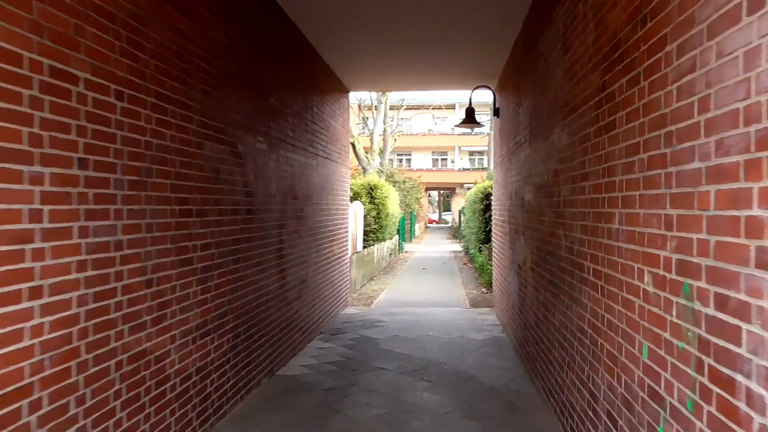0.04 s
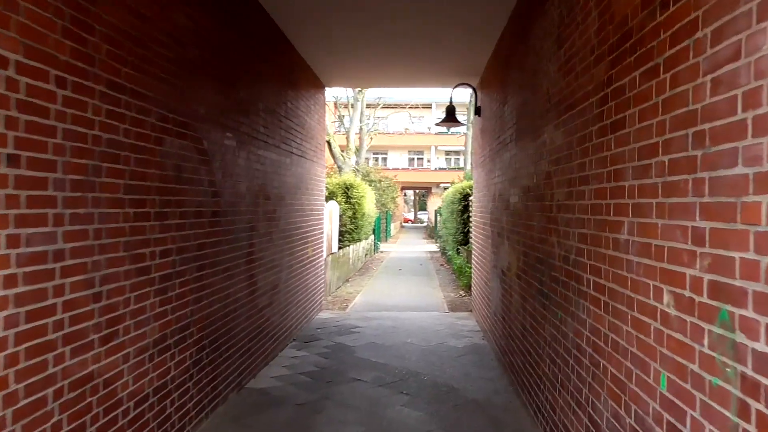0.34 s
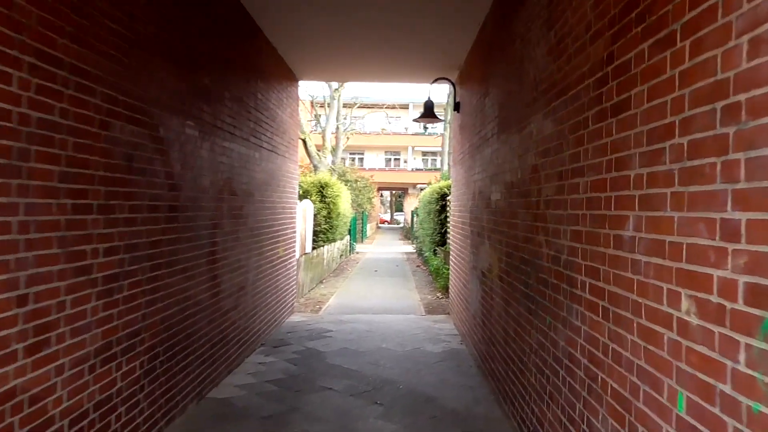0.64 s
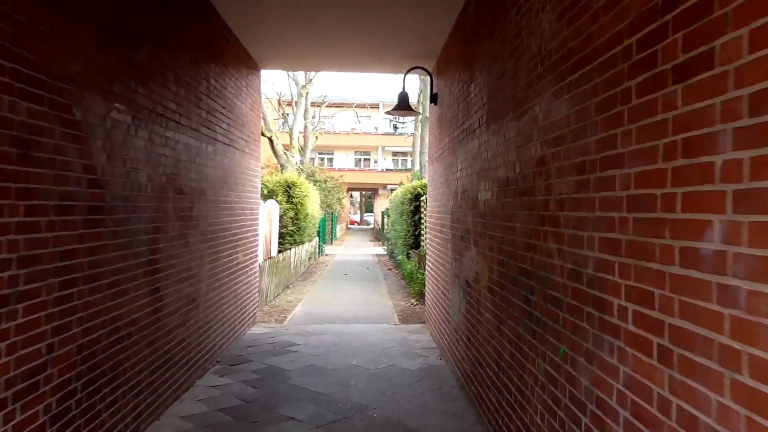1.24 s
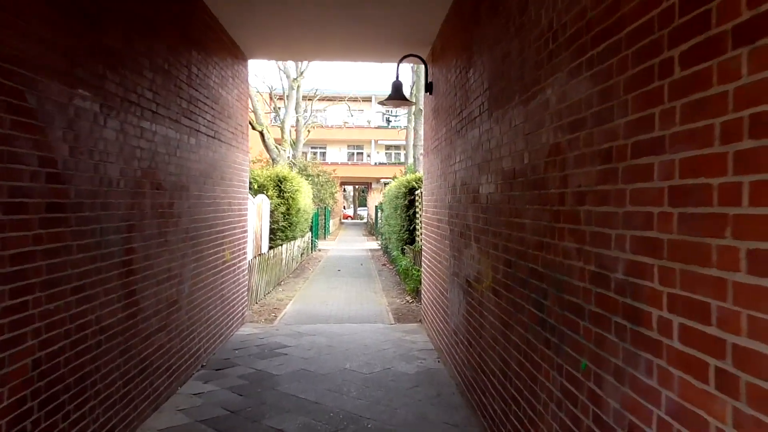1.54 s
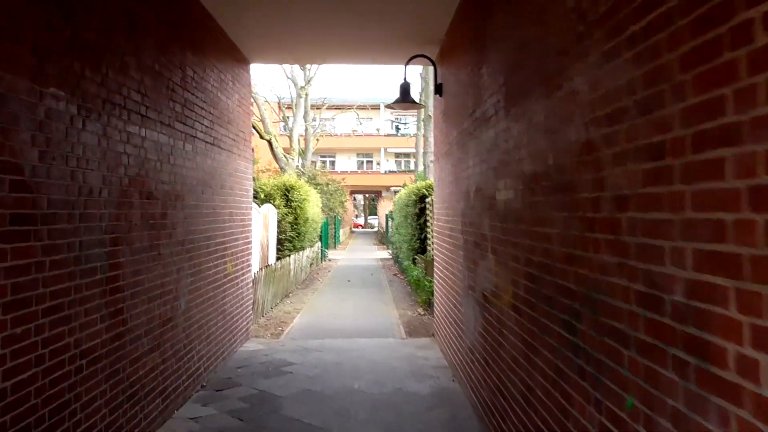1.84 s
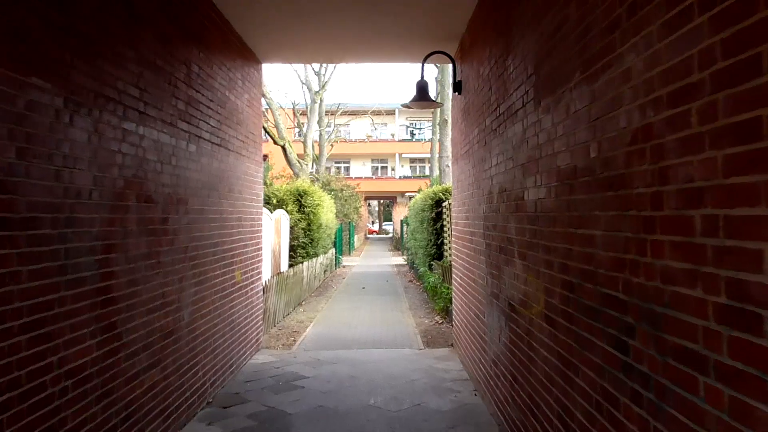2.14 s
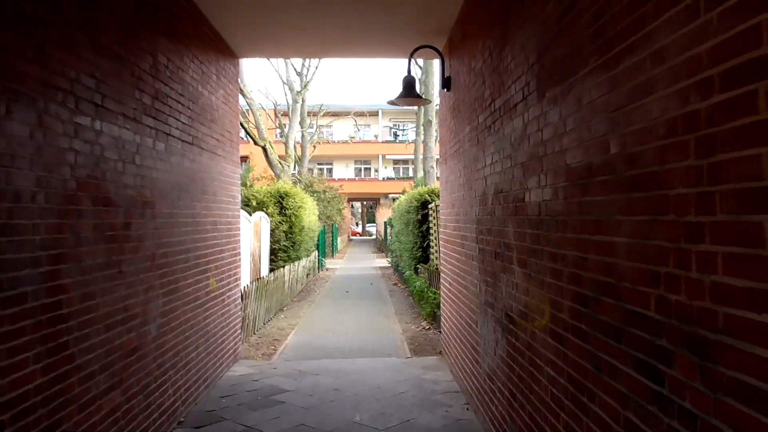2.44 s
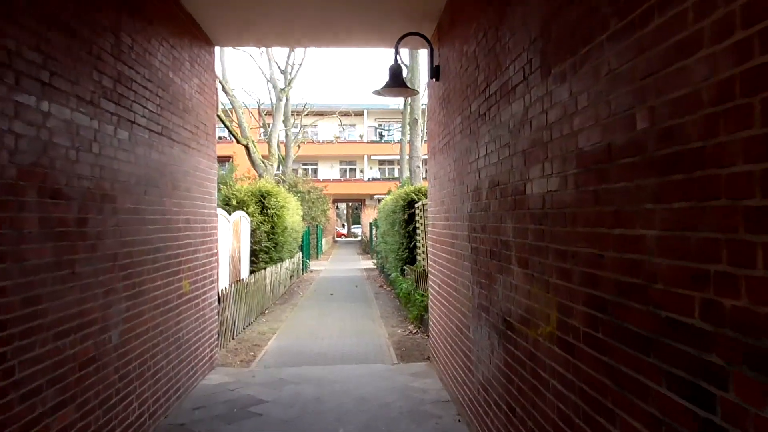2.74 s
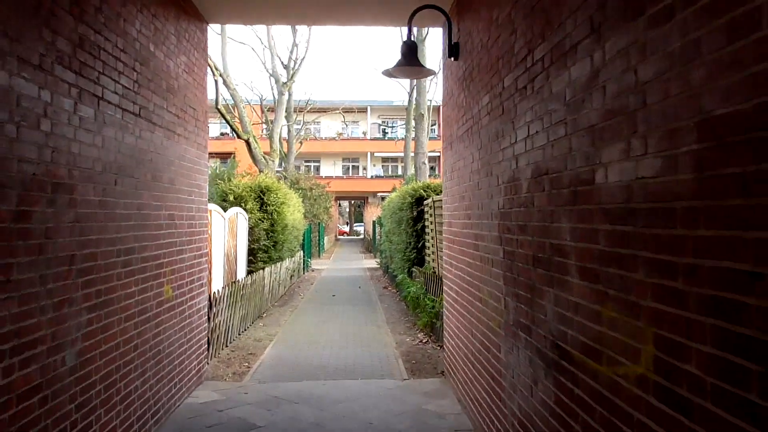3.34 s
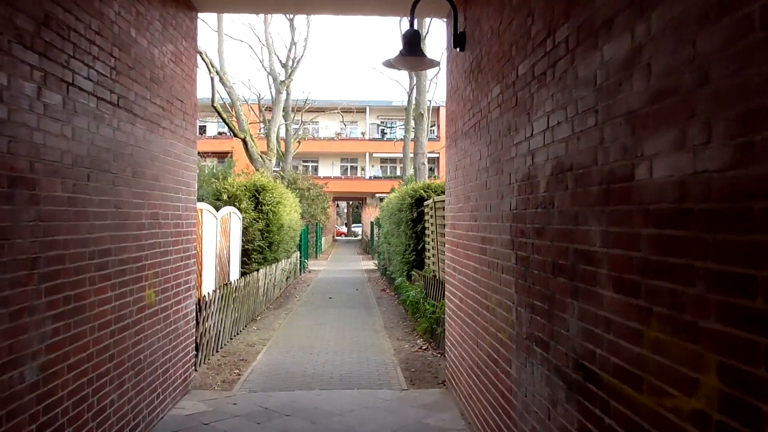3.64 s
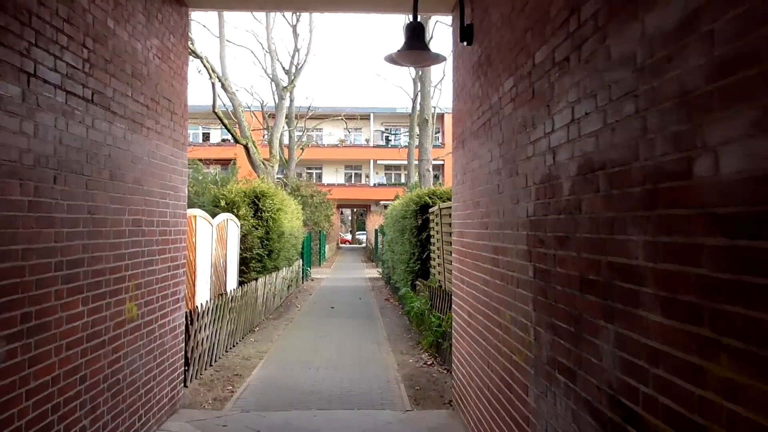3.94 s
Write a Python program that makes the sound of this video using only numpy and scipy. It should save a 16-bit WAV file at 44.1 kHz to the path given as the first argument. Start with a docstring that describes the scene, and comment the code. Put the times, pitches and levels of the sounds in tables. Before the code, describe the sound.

Soft footsteps thud and scuff at an easy pace through a brick underpass, with occasional grit cracks. The jacket of the walker holding the microphone rustles in chirp-like whistles. The walls echo over a low outdoor rumble and hiss.

```python
"""A short brick underpass: someone walks through at an easy pace, holding the microphone.
Soft heels thud; soles roll, pat, scuff and crack grit on the paving. Smooth jacket fabric rustles and,
sliding on itself, gives chirp-like whistles that glide with the speed of the arm.
The walls echo steps and whistles over a low outdoor rumble and a steady hiss."""
import sys
import numpy as np
from scipy import signal
from scipy.fft import rfft, irfft
from scipy.io import wavfile

SR = 44100
rng = np.random.default_rng(int(sys.argv[2]) if len(sys.argv) > 2 else 0)


def file_out(sig):
    """Save sig as 16-bit WAV at sys.argv[1]."""
    # one column per channel
    cols = np.atleast_2d(sig).T
    # limit, then scale
    lim = np.clip(cols, -1, 1)
    pcm = np.round(lim * 32767).astype(np.int16)
    wavfile.write(sys.argv[1], SR, pcm)


N = 176400
TIME_S = np.arange(N) / SR
BIN_HZ = np.fft.rfftfreq(N, 1 / SR)


def undb(db):
    """Decibels to gain."""
    return 10 ** (np.asarray(db) / 20)

def on_bins(points):
    """(Hz, value) points interpolated over log frequency at every bin."""
    hz, value = np.array(points, float).T
    return np.interp(np.log(BIN_HZ + 1e-3), np.log(hz), value)

def tint(x, points):
    """Filter by (Hz, dB) points."""
    return irfft(rfft(x) * undb(on_bins(points)), N)

def noise(points):
    """Coloured noise of rms 1."""
    x = tint(rng.standard_normal(N), points)
    return x / x.std()

def stereo(mid, side):
    """Left and right from mid and side."""
    return np.array([mid + side, mid - side])

def burst(start_s, decay_s, attack_s=.0006):
    """Quick attack, exponential release."""
    age_s = np.maximum(TIME_S - start_s, 0)
    return (1 - np.exp(-age_s / attack_s)) * np.exp(-age_s / decay_s)

def swells(rows):
    """Bell-shaped envelopes, summed in power."""
    power = sum(undb(db) ** 2 * np.exp(-2 * ((TIME_S - mid_s) / half_s) ** 2)
                for mid_s, half_s, db in rows)
    return np.sqrt(power + 1e-18)

def grain(rate_hz, depth_db):
    """Uneven catching of a rubbed surface: a wandering gain of rms 1."""
    walk = irfft(rfft(rng.standard_normal(N)) * np.exp(-(BIN_HZ / rate_hz) ** 2), N)
    gain = undb(depth_db * walk / walk.std())
    return gain / np.sqrt(np.mean(gain ** 2))

def flutter(size, width_hz):
    """Complex random amplitude of rms 1 that widens a spectral line."""
    fft_size = 8192 * (1 + size // 8192)
    lowpass = np.exp(-(np.fft.rfftfreq(fft_size, 1 / SR) / width_hz) ** 2)
    real, imag = irfft(rfft(rng.standard_normal((2, fft_size))) * lowpass, fft_size)[:, :size]
    z = real + 1j * imag
    return z / np.sqrt(np.mean(abs(z) ** 2))


# Stereo width of diffuse sound. Each row: frequency in Hz, side minus mid in dB.
DIFFUSE_WIDTH = [(50, -6), (125, -22), (250, -9.5), (500, -6.5), (1000, -2.5), (2500, -3), (4500, -2),
                 (8000, 2), (12000, 0.5)]

def diffuse(points):
    """Coloured noise arriving from all around."""
    return stereo(noise(points), tint(noise(points), DIFFUSE_WIDTH))


# Background spectra. Each row: frequency in Hz, level in dB.
RUMBLE_SPECTRUM = [(25, -55), (97, -22), (208, -6), (278, -4), (331, -2), (444, -6), (707, -2), (1220, -8),
                   (1760, -14.5), (2200, -11.5), (3400, -29.5)]
HISS_SPECTRUM = [(1500, -37), (3000, 0), (4500, .5), (6500, 3), (11500, 3.5), (14000, -.5), (15500, -9)]

def background(rumble_db=-52, rise_db_per_s=.9, top_hz=2500, hiss_db=-56):
    """Outdoor rumble that grows as the exit nears, and a steady hiss."""
    rumble = signal.sosfilt(signal.butter(2, top_hz, fs=SR, output="sos"), diffuse(RUMBLE_SPECTRUM))
    level_db = rumble_db + rise_db_per_s * (TIME_S - N / SR / 2)
    return rumble * undb(level_db) + undb(hiss_db) * diffuse(HISS_SPECTRUM)


# Echo decay. Each row: frequency in Hz, T60 in seconds.
ECHO_T60 = [(150, 0.86), (700, 0.64), (4500, 0.5), (14000, 0.87)]
# Echo colour. Each row: frequency in Hz, level in dB.
ECHO_SPECTRUM = [(120, -1.5), (300, 3), (900, -1), (3000, 3.5), (7000, -0.5), (14000, -11.5)]
NEAR_WALL_S = .011

def wall_response():
    """Stereo impulse response of the brick walls: a dense tail, each octave dying at its own rate."""
    t60_s = on_bins(ECHO_T60)
    spectra = rfft(rng.standard_normal((2, N))) * undb(on_bins(ECHO_SPECTRUM))
    tail = 0
    for low_hz in 62.5 * 2. ** np.arange(8):
        band = (BIN_HZ >= low_hz) & (BIN_HZ < 2 * low_hz)
        tail += irfft(spectra * band, N) * undb(-60 * TIME_S / t60_s[band].mean())
    mid, side = tail * np.clip(TIME_S / NEAR_WALL_S - .5, 0, 1)
    return stereo(mid, tint(side, DIFFUSE_WIDTH))[:, :SR] / np.sqrt(np.sum(mid ** 2))


# Rustles. Each row: middle in seconds, half length in seconds, level in dB.
JACKET_RUSTLES = [(.74, 0.13, -54.5), (1.26, 0.11, -53.5), (1.54, .027, -51.5), (1.78, 0.067, -51.5),
                  (2.36, 0.21, -56.5), (2.835, 0.062, -49), (3.38, 0.38, -55), (3.85, 0.19, -50.5)]
# Rustle colour. Each row: frequency in Hz, level in dB.
RUSTLE_SPECTRUM = [(800, -34), (2000, -1.5), (5000, 1), (8000, 6.5), (11500, 4.5), (15000, -13)]

def jacket_rustle():
    """Fabric rubs in swells of bright, grainy noise."""
    return diffuse(RUSTLE_SPECTRUM) * swells(JACKET_RUSTLES) * grain(rate_hz=430, depth_db=2)


# Whistles. Each row: start and length in seconds, first, middle and last pitch in Hz, level in dB,
# spread as a fraction of pitch.
JACKET_WHISTLES = [(-.04, 0.08, 4460, 3840, 3084, -38, 0.08), (-.03, 0.095, 6740, 5720, 4290, -43, 0.21),
                   (-.1, 0.43, 4530, 4460, 4500, -64, 0.028), (0.623, .046, 7600, 7140, 7060, -63, 0.022),
                   (0.852, 0.039, 1970, 2500, 3100, -52, 0.065),
                   (0.879, 0.058, 2953, 3350, 3386, -39, 0.0095),
                   (0.935, 0.041, 3580, 3780, 4430, -48, 0.02),
                   (.948, 0.083, 2124, 2220, 2245, -43.5, 0.018),
                   (1.289, 0.057, 2700, 3260, 3450, -49, 0.024),
                   (1.331, 0.053, 3440, 3744, 3920, -41.5, 0.028),
                   (1.374, 0.047, 2280, 2205, 2270, -52, 0.006),
                   (1.394, 0.082, 4200, 3357, 2030, -40.5, 0.09),
                   (2.064, 0.11, 6300, 5530, 4180, -52, 0.065), (2.081, 0.12, 5040, 4025, 1640, -45, .06),
                   (2.217, 0.055, 3740, 2882, 2020, -46.5, 0.056),
                   (2.249, 0.067, 3710, 3350, 2910, -47.5, .09),
                   (2.298, 0.054, 2140, 2220, 2120, -43.5, 0.044),
                   (3.044, 0.062, 5900, 4610, 3400, -51.5, 0.081),
                   (3.078, 0.054, 5600, 4400, 3360, -48, .07), (3.099, .072, 4000, 3280, 2280, -41.5, 0.07),
                   (3.291, .075, 3400, 3630, 3940, -41.5, 0.027),
                   (3.333, 0.15, 1860, 2190, 2224, -49, 0.057),
                   (3.446, 0.083, 6180, 5560, 3900, -57, 0.034),
                   (3.575, 0.042, 2184, 2354, 2480, -46.5, 0.019), (3.548, .07, 7600, 8200, 8500, -57, .02),
                   (3.602, 0.09, 11100, 10460, 9270, -62, 0.055),
                   (3.592, 0.072, 6740, 5810, 4930, -57, 0.035),
                   (3.669, .1, 4384, 3340, 2620, -47.5, 0.034), (3.674, .09, 6840, 5830, 3730, -48, 0.0584),
                   (3.776, .13, 7180, 6520, 4950, -44.5, .16), (3.793, 0.1, 4750, 4140, 3404, -36.5, 0.1)]
# Partials of the weave. Each row: multiple of the pitch, relative level in dB.
WEAVE_PARTIALS = [(.5, -10.5), (1.5, -17)]

def jacket_whistles(even_spread=.028, catch_hz=86.8, fuzz_db=-5, rasp_db=-8.5):
    """Threads tick over threads, pitch following sliding speed. Even sliding gives a clean line with
    faint partials; uneven sliding staggers, blurs and rasps. Returns mid and side."""
    out = np.zeros((2, N))
    for start_s, length_s, first_hz, middle_hz, last_hz, db, spread in JACKET_WHISTLES:
        size = int(length_s * SR)
        progress = np.linspace(0, 1, size)
        glide_hz = np.polyval(np.polyfit([0, .5, 1], [first_hz, middle_hz, last_hz], 2), progress)
        evenness = np.exp(-(spread / even_spread) ** 2)
        index = int(start_s * SR) + np.arange(size)
        inside = (index >= 0) & (index < N)
        for channel, clean in zip(out, (evenness, 0)):
            hz = glide_hz * (1 + .5 * spread * flutter(size, catch_hz).real)
            phase = 2 * np.pi * np.cumsum(hz) / SR
            line = clean + np.sqrt(1 - clean ** 2) * flutter(size, spread * middle_hz)
            fuzz = undb(fuzz_db) * flutter(size, width_hz=3.2 * spread * middle_hz)
            rasp = undb(rasp_db) * flutter(size, width_hz=870)
            weave = sum(undb(part_db) * np.exp(1j * k * phase) for k, part_db in WEAVE_PARTIALS)
            tone = (line + (1 - evenness / 2) * (fuzz + rasp)) * np.exp(1j * phase) + evenness * weave
            channel[index[inside]] += (undb(db) * tone.real * np.sin(np.pi * progress))[inside]
    return np.sqrt(2) * out * grain(rate_hz=130, depth_db=1.5)


# Grit cracks. Each row: start in seconds, level in dB.
GRIT_CRACKS = [(0.303, -45), (.693, -35), (.723, -36), (1.728, -40), (2.364, -29), (2.382, -39),
               (2.794, -44.5), (2.813, -45), (2.851, -43), (2.874, -35), (3.334, -34), (3.957, -50)]
# Crack colour. Each row: frequency in Hz, level in dB.
CRACK_SPECTRUM = [(300, -4), (1500, 9.5), (4000, 8.5), (9000, -0.5), (12000, 9), (15000, -14)]

def grit_cracks(decay_s=.0016):
    """Grit cracks under the sole in short, bright clicks."""
    return noise(CRACK_SPECTRUM) * sum(undb(db) * burst(at_s, decay_s) for at_s, db in GRIT_CRACKS)


# Scuffs. Each row: middle in seconds, half length in seconds, level in dB.
SOLE_SCUFFS = [(.24, 0.094, -56), (.80, 0.096, -48), (1.01, 0.08, -48.5), (1.28, 0.082, -52.5),
               (1.56, 0.33, -53), (1.84, 0.64, -55.5), (2.33, 0.063, -46), (2.50, 0.18, -57),
               (2.97, 0.19, -50.5), (3.17, 0.036, -47), (3.40, 0.18, -50), (3.63, 0.062, -46.5),
               (3.92, 0.11, -51)]
# Scuff colour. Each row: frequency in Hz, level in dB.
SCUFF_SPECTRUM = [(80, -83), (200, -1.5), (450, 2.5), (750, 7.5), (1300, 2), (1800, -14.5), (4000, -8),
                  (12000, -21.5)]

def sole_scuffs():
    """The sole drags over the paving, catching unevenly."""
    return noise(SCUFF_SPECTRUM) * swells(SOLE_SCUFFS) * grain(rate_hz=116, depth_db=3.5)


def knocks(blows, modes, scatter=.09, contact_s=.0015, wall_db=-15, low_cut_hz=180):
    """Each blow rings damped modes, detuned as the foot lands; the near wall returns it once."""
    t = TIME_S[:SR // 4]
    out = np.zeros(N + 2 * len(t))
    for start_s, db, *_ in blows:
        *detunes, wall_jitter = rng.uniform(-1.05, 1, len(modes) + 1)
        ring = 0
        for (hz, mode_db, t60_s), detune in zip(modes, detunes):
            ring += undb(mode_db - 60 * t / t60_s) * np.sin(2 * np.pi * hz * (1 + scatter * detune) * t)
        ring *= 1 - np.exp(-t / contact_s)  # a soft sole takes hold gradually
        for lag_s, path_db in ((0, 0), (NEAR_WALL_S * (1 + .18 * wall_jitter), wall_db)):
            first = int((start_s + lag_s) * SR)
            out[first:first + len(t)] += undb(db + path_db) * ring
    return signal.sosfilt(signal.butter(3, low_cut_hz, "high", fs=SR, output="sos"), out[:N])


# Pats. Each row: start in seconds, tap level in dB, scrape level in dB, scrape decay in seconds.
SOLE_PATS = [(0.141, -51, -41.5, 0.0098), (.454, -42.5, -38, 0.0068), (.487, -45.5, -47, 0.011),
             (0.681, -50, -44, 0.018), (.828, -27.5, -40, 0.0078), (1.002, -62, -39, 0.0055),
             (1.195, -52, -42.5, 0.016), (1.527, -30.5, -32.5, 0.012), (1.723, -36, -39, 0.014),
             (1.829, -31.5, -53, 0.0098), (1.872, -30.5, -42, 0.0094), (2.793, -29, -45.5, 0.021),
             (2.932, -35, -30.5, 0.0088), (3.32, -28, -41, 0.029), (3.972, -26.5, -52, 0.018)]
# Modes of a flat sole on paving. Each row: frequency in Hz, level in dB, T60 in seconds.
TAP_MODES = [(426, -0.5, 0.016), (603, 1.5, 0.025), (830, -1.5, 0.025), (1237, 4, 0.0078)]
# Scrape colour. Each row: frequency in Hz, level in dB.
SCRAPE_SPECTRUM = [(80, -16), (200, -12), (400, 3), (750, 8.5), (1300, -0.5), (1800, -12), (4000, -24.5),
                   (10000, -16), (14000, -56)]

def sole_pats():
    """The flat sole meets the paving with a tap and a brief scrape."""
    scrape_gain = sum(undb(db) * burst(at_s, decay_s) for at_s, _, db, decay_s in SOLE_PATS)
    return knocks(SOLE_PATS, TAP_MODES) + noise(SCRAPE_SPECTRUM) * scrape_gain


# Heel strikes. Each row: start in seconds, thud level in dB, roll level in dB, roll decay in seconds.
HEEL_STRIKES = [(.144, -36, -42, 0.0087), (0.682, -28, -63, 0.033), (1.203, -31.5, -48, 0.03),
                (1.226, -30.5, -44, 0.026), (1.735, -28, -37, 0.015), (2.258, -31.5, -41.5, 0.063),
                (2.793, -31.5, -42, 0.035), (3.318, -28.5, -47, 0.12), (3.834, -25.5, -42, 0.054)]
# Modes of a heel on paving. Each row: frequency in Hz, level in dB, T60 in seconds.
THUD_MODES = [(250, 2.5, .03), (334.7, 3.5, 0.036), (688, -10.5, 0.071), (1450, -17, 0.031),
              (2230, -11, 0.015)]
# Roll colour. Each row: frequency in Hz, level in dB.
ROLL_SPECTRUM = [(50, -27), (120, -15.5), (200, 0), (350, -4), (800, -18), (2500, -22), (12000, -52)]

def heel_strikes():
    """A soft heel thuds and the sole rolls down after it. Returns thud and roll."""
    roll_gain = sum(undb(db) * burst(at_s, decay_s) for at_s, _, db, decay_s in HEEL_STRIKES)
    return knocks(HEEL_STRIKES, THUD_MODES), noise(ROLL_SPECTRUM) * roll_gain


def scene(thud_wet_db=-14.5, sole_wet_db=-4.5, whistle_wet_db=-10.5, side_db=-8.5, right_over_left_db=1):
    """Shoes, jacket and their echo over the background."""
    thud, roll = heel_strikes()
    sole = roll + sole_pats() + sole_scuffs() + grit_cracks()
    whistle, whistle_side = jacket_whistles()
    direct = thud + sole + stereo(whistle, undb(side_db) * whistle_side) + jacket_rustle()
    to_walls = undb(thud_wet_db) * thud + undb(sole_wet_db) * sole + undb(whistle_wet_db) * whistle
    echo = signal.fftconvolve(wall_response(), to_walls[None], axes=1)[:, :N]
    balance = undb(right_over_left_db * np.array([[-.5], [.5]]))
    return (background() + echo + direct) * balance

def record(dry, bass_cut_hz=50, top_hz=15700):
    """The microphone sheds the deep bass and cuts the top."""
    thin = signal.sosfilt(signal.butter(1, bass_cut_hz, "high", fs=SR, output="sos"), dry)
    return signal.sosfilt(signal.ellip(10, .2, 80, top_hz, fs=SR, output="sos"), thin)


dry = scene()
out = record(dry)
file_out(out)
```